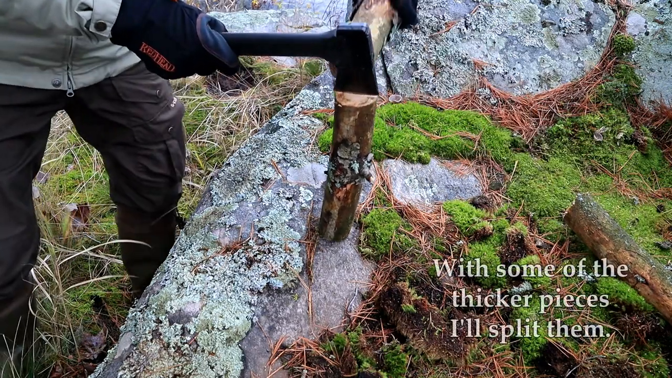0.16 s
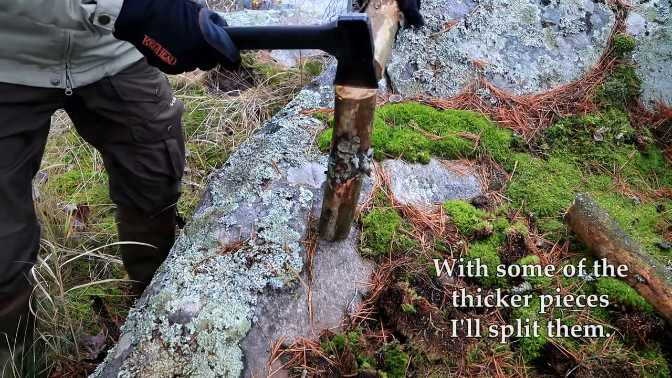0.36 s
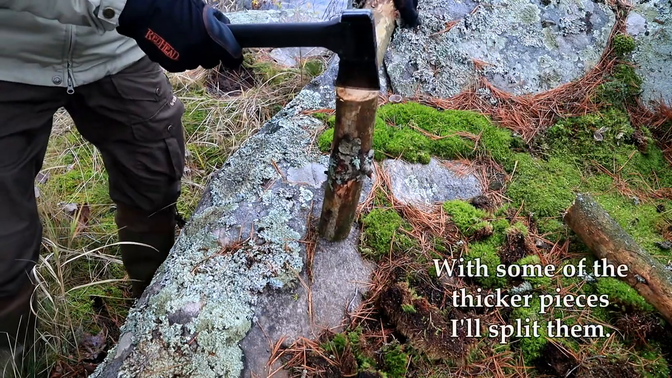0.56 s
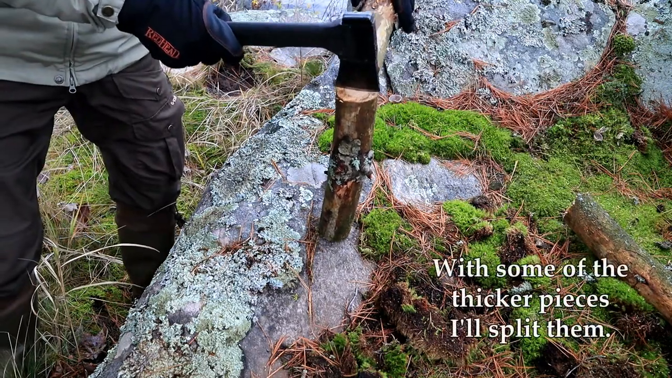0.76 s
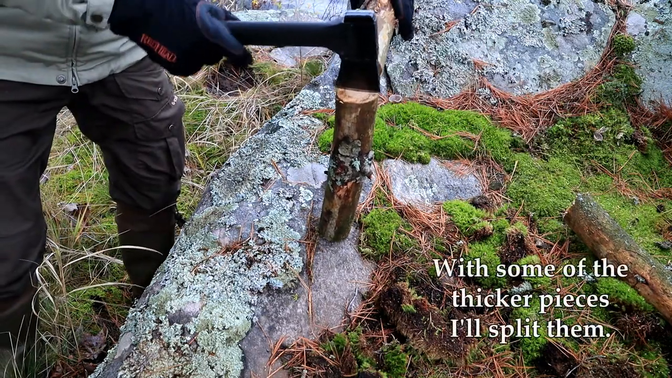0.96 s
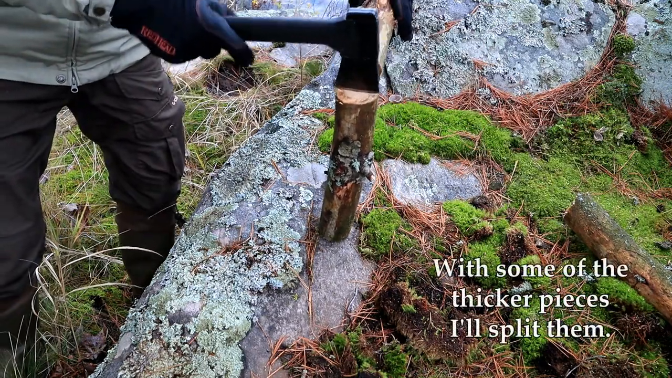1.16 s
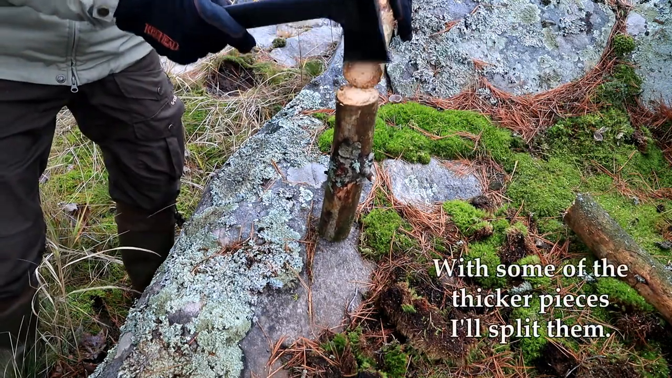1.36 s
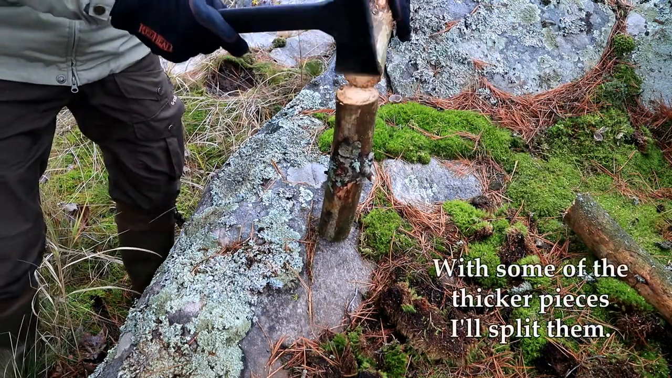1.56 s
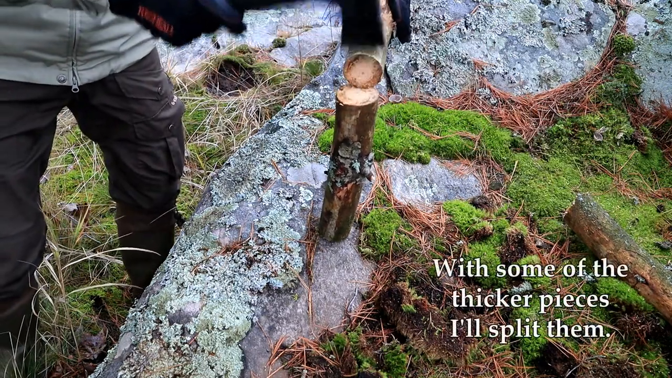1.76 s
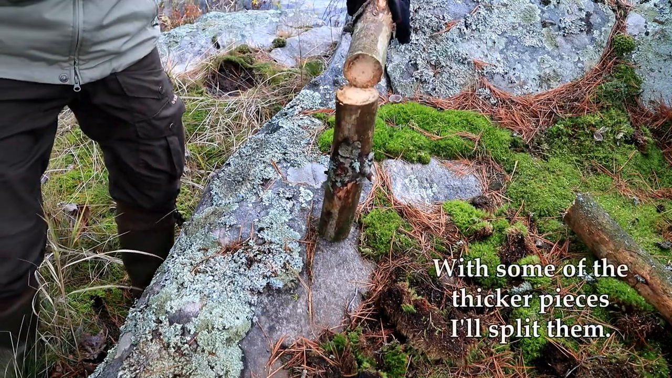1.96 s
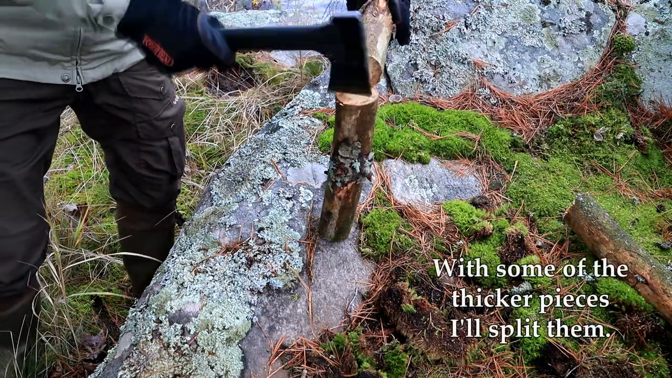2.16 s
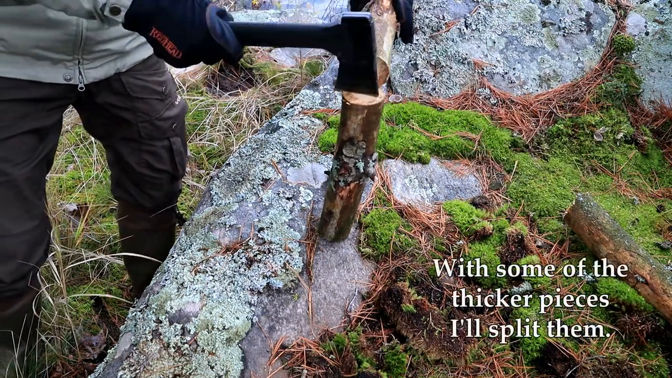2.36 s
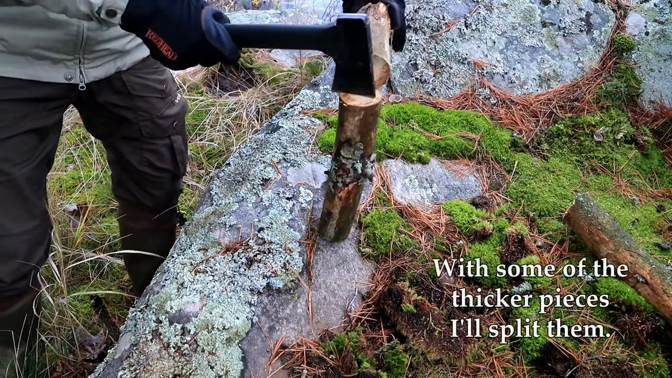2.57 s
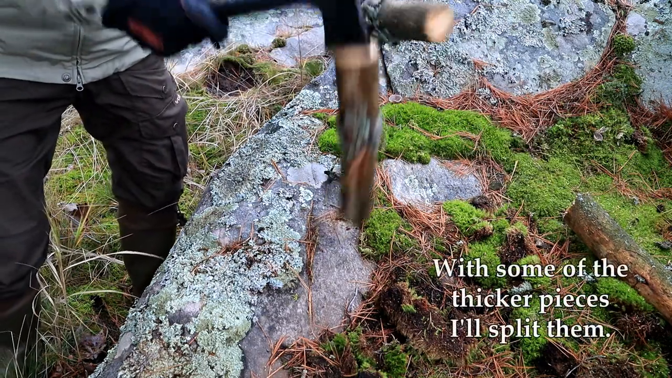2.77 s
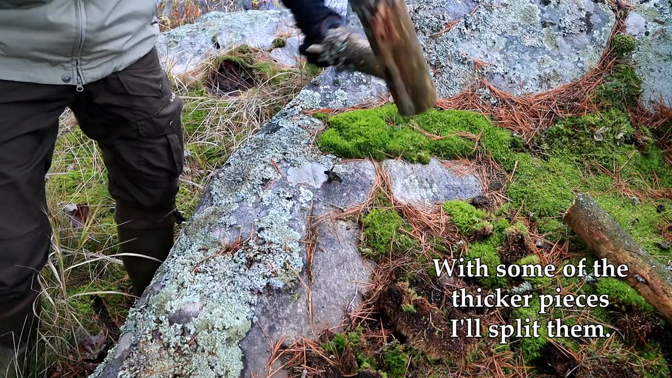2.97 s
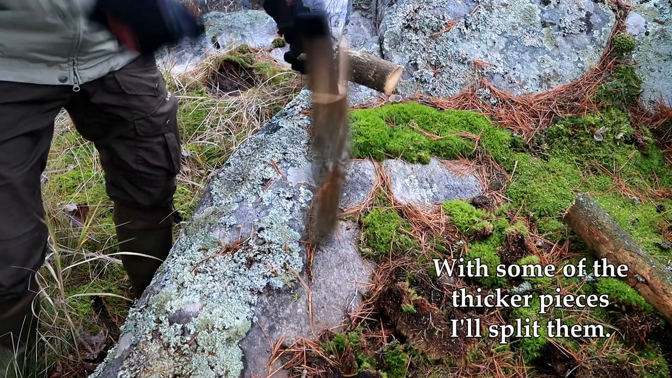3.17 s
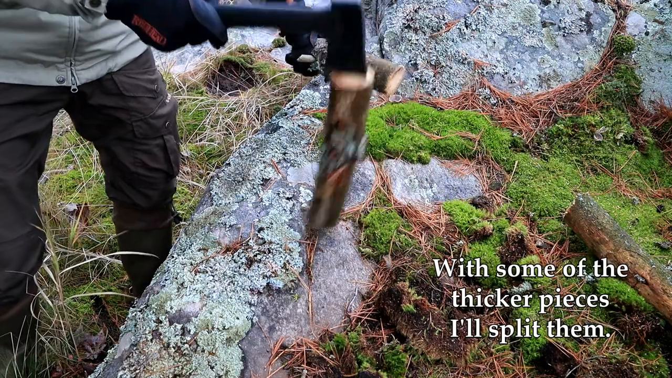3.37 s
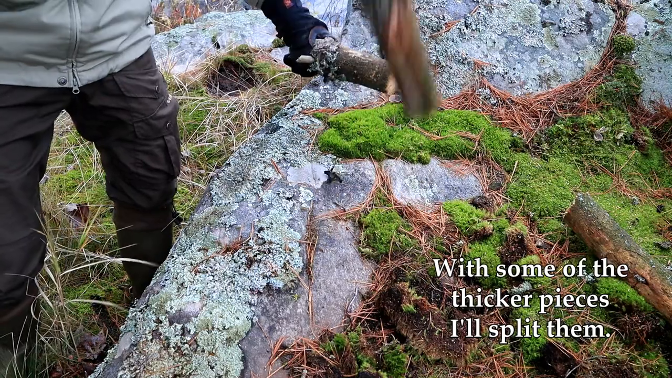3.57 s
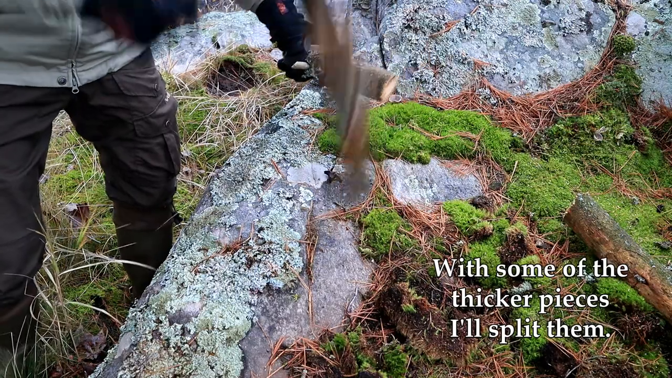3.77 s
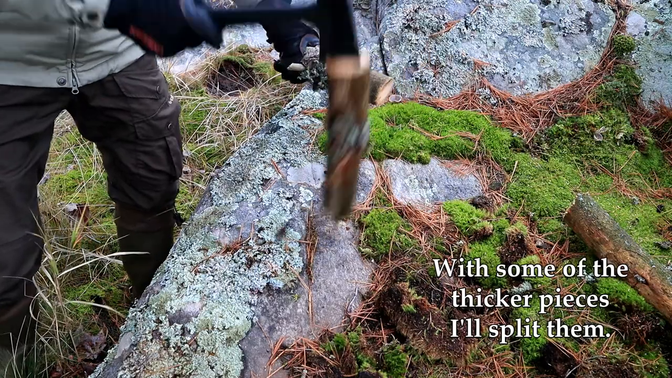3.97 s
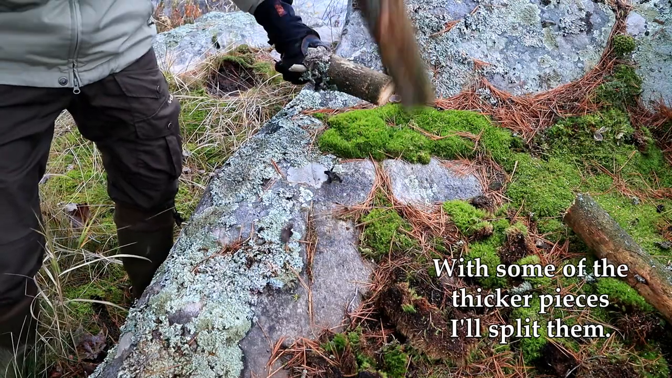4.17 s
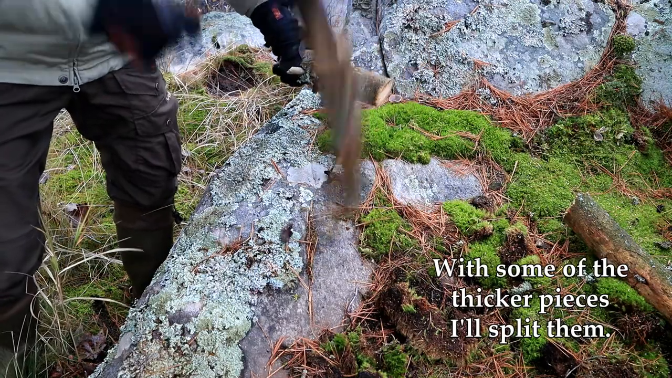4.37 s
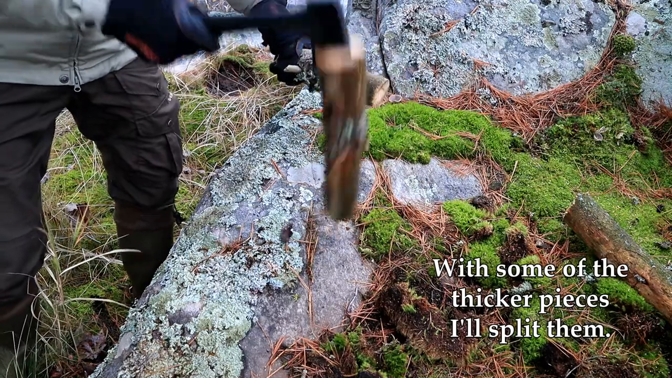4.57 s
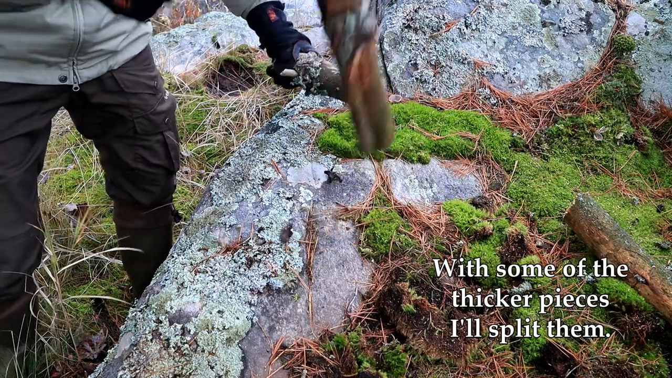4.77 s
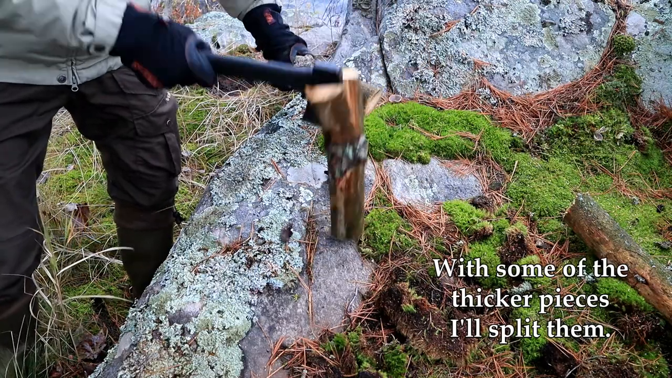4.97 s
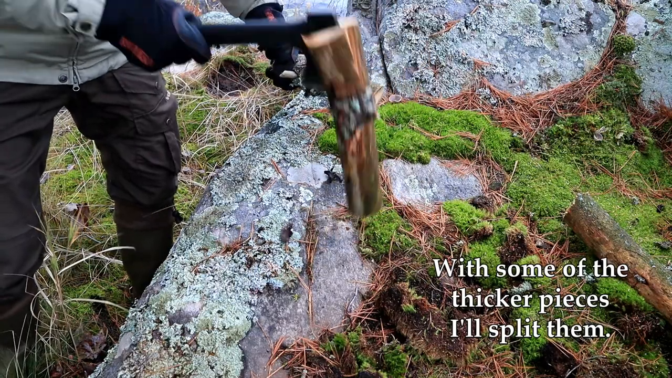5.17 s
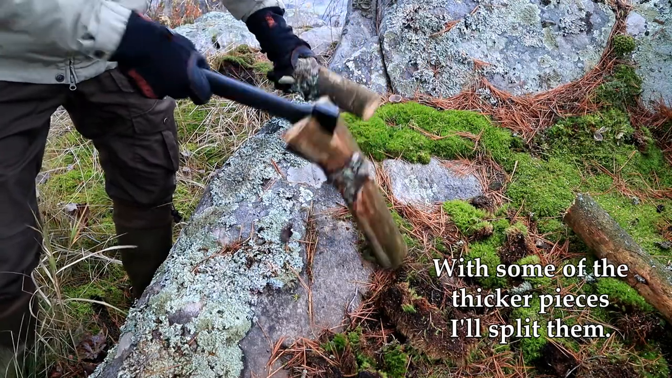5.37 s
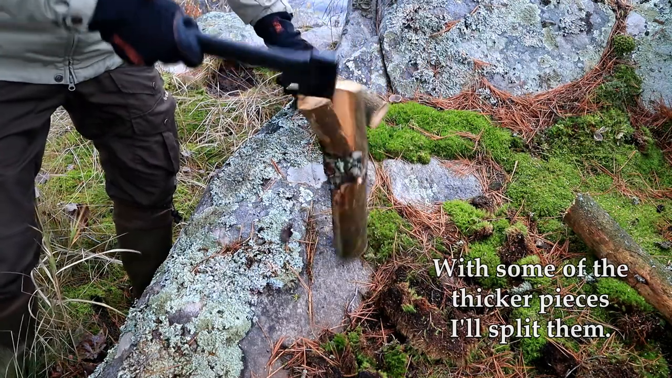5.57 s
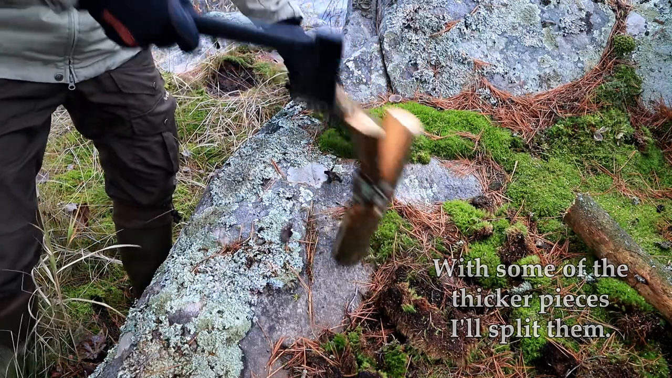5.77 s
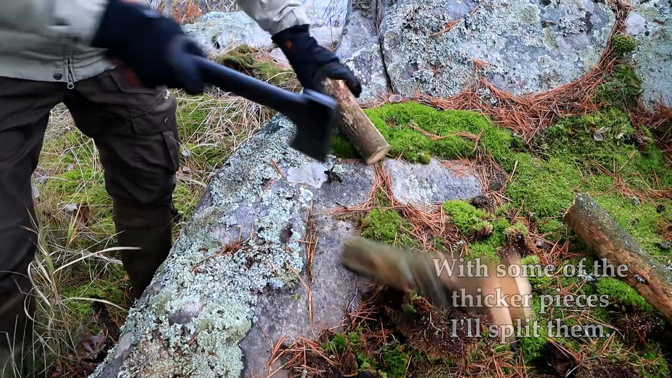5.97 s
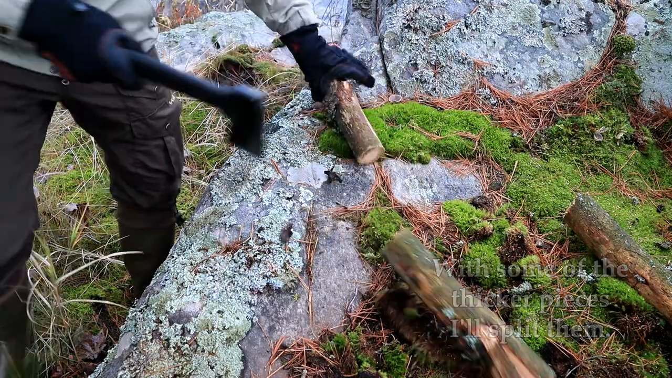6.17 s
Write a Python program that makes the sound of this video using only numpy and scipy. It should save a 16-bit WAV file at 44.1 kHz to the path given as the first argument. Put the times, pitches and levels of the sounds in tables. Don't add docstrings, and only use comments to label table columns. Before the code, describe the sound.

A faint wood scuff and light tap, then near quiet with cloth rustle and tiny ticks. Five hard, dry slams of a hatchet lodged in a log follow, the gaps shortening. The last breaks into clustered cracks; splintering and small wooden knocks follow. Close outdoor microphone, overloaded by each blow, with soft wind rumble and distant airy hiss.

```python
import sys
import numpy as np
from scipy import signal
from scipy.io import wavfile

SR = 44100
rng = np.random.default_rng(int(sys.argv[2]) if len(sys.argv) > 2 else 0)


def ratio(d):
    e = np.asarray(d, float) / 20
    return 10 ** e


def persist_wave(psi):
    counts = np.round(np.clip(psi, -1, 1) * 32767).astype(np.int16)
    wavfile.write(sys.argv[1], SR, np.atleast_2d(counts).T)


N = 274516

# t/s, contact/ms
SLAM_TIMES = [
    (.3527, .65),
    (2.2023, .4),
    (3.2348, .25),
    (3.8810, .65),
    (4.4596, .6),
    (4.9554, 1.3),
]
# strength level/dB, low push level/dB, splinter level/dB, splinter length factor
SLAMS = [(1.52, -45, -24.5, 0.79), (20, -20, 10, 0.68), (24.2, 15.5, 6.5, 0.66), (27.1, 12, 14, 0.59),
         (26.7, 17, 10, 0.84), (22, -26, 4, 0.99)]
# f/Hz, width/Hz, level/dB
LOG_MODES = [
    [(674, 250, -2), (1055, 194, 4), (1500, 100, 6), (2200, 96, -2), (3500, 120, 0)],
    [(687, 152, 4.5), (1130, 114, 2), (1800, 150, -18.5), (2780, 490, -21), (3120, 130, -16)],
    [(482, 132, 3), (1067, 154, 3), (1520, 125, -5.5), (2400, 370, -10.5), (3750, 650, -8.5)],
    [(655, 197, 1), (1020, 150, -4), (1580, 300, -13.5), (1920, 368, -5.5), (2770, 300, -17)],
    [(738, 250, 1), (966, 180, 0), (1548, 186, 10.5), (2380, 240, 3), (3750, 360, -22)],
    [(612, 280, 13), (1140, 550, -2.5), (1650, 210, -12), (2520, 290, 2), (4060, 530, -29)],
]
HANDLE_HUMS = [-70, -9.5, -14.5, -13, -72, -70]
HANDLE_HZ, HANDLE_T60_S = 310.4, 0.3
# f/Hz, t60/s
SPLINTER_T60 = [(300, 0.032), (1000, 0.051), (3000, 0.021), (8000, 0.031), (15000, 0.0076)]
# f/Hz, level/dB per Hz
SPLINTER_COLOUR = [(150, 8), (600, 4.5), (1800, 7), (4000, -6), (8000, -26.5), (15000, -66)]

# t/s, peak level/dB, centre f/Hz, t60/s
CRACKS = [(.3545, -31, 2780, 0.017), (2.2035, 14, 3280, .014), (2.547, -39, 4900, 0.05),
          (3.2348, 20.5, 3980, 0.013), (3.8827, 16, 1400, 0.022), (4.472, 18.5, 1170, 0.027),
          (4.96, 10, 5240, 0.012), (4.9647, 25.5, 3940, 0.02), (4.9765, 16.5, 6000, 0.011),
          (4.9812, 10, 4000, .014), (4.987, -10, 3020, 0.035), (5.3993, -2, 4060, 0.018),
          (5.4075, -11, 5000, .012), (5.4103, 0, 5000, 0.0049), (5.42, -19.5, 3500, 0.045),
          (5.426, -38, 4000, .013), (5.4485, 0, 10100, 0.009), (5.8571, -27, 3870, 0.033),
          (6.0945, -21, 5900, 0.0076)]
CRACK_OCTAVES, CRACK_RISE_MS = 3.8, 0.66
# t/s, peak level/dB, centre f/Hz, rise/ms
TEARS = [
    (0.034, -25, 3630, 3),
    (4.463, 27.5, 2630, 1.26),
    (5.335, -26.5, 1800, 8.9),
    (5.355, -27.5, 5330, 15),
    (5.39, -16.5, 2230, 5.9),
    (5.3965, -10.5, 3000, 1.1),
    (5.449, -23, 5040, 3.7),
    (5.603, -19, 3140, 2.8),
    (6.124, -25, 4400, 13.6),
]
TEAR_OCTAVES, TEAR_T60_PER_RISE = 4.04, 12.8
# t/s, peak level/dB, centre f/Hz
TICKS = [(.3165, -35, 3500), (.6807, -30.5, 8900), (.7653, -42, 9000), (.9963, -27.5, 5840),
         (1.7525, -36, 3000), (1.7834, -28, 6800), (1.795, -28, 3900), (1.949, -26, 1690),
         (2.289, -31, 5600), (2.296, -34, 6900), (2.378, -44, 8000), (2.735, -33, 7900), (2.999, -32, 6000),
         (3.641, -36, 8000), (3.9477, -20, 5530), (4.742, -40, 8100), (4.832, -41, 8000),
         (5.019, -34, 1990), (5.4135, -6, 6500), (5.5455, -32, 6960), (5.6517, -27.5, 2400),
         (5.8, -41, 6000), (5.818, -43, 8000), (6.19, -33, 12000)]
TICK_OCTAVES, TICK_RISE_MS, TICK_T60_S = 0.95, 0.81, 0.016

# t/s, peak level/dB, f/Hz, t60/s
KNOCKS = [(0.036, -23.5, 1540, 0.017), (0.401, -16, 900, 0.0035), (0.4019, -8.5, 314, 0.0076),
          (1.243, -26, 218, 0.033), (1.401, -30.5, 1403, 0.058), (1.888, -48, 5130, .06),
          (4.964, 22, 2210, 0.0098), (4.977, 12.5, 420, 0.009), (4.9778, 6, 2110, 0.018),
          (5.396, -8, 300, 0.012), (5.399, -16.5, 1770, 0.019), (5.411, -22, 1480, .025),
          (5.4488, -20, 2030, 0.024), (5.568, -38, 4380, 0.025), (5.606, -31.5, 2060, 0.063),
          (5.603, -41, 1070, 0.15), (5.4488, -17, 1000, 0.0078), (5.613, -10, 346, 0.01),
          (6.139, -12.5, 127, 0.018)]

# delay t/s, level/dB
ECHOES = [(.0036, -17), (.0081, -30)]
WOODS_DB, WOODS_T60_S, WOODS_LOW_HZ, WOODS_HIGH_HZ = -43.5, 0.24, 720, 6500

# t/s, peak level/dB, centre f/Hz, t60/s
SWISHES = [(0.199, -38, 3500, 0.11), (0.449, -41.5, 5760, .33), (.99, -36, 6500, 0.19),
           (1.079, -36.5, 7400, 0.036), (1.4, -38.5, 7000, 0.24), (1.48, -39.5, 7160, 0.097),
           (2.65, -40, 3850, 0.56), (3.3, -38, 4400, 0.66), (3.961, -36.5, 3500, 0.44), (4.3, -39, 3520, 1),
           (4.561, -33.5, 1720, 0.39)]
SWISH_OCTAVES, SWISH_RISE_MS = 2.1, 27.4
# t/s, peak level/dB, centre f/Hz, t60/s
BLADE_RINGS = [(.03, -58, 5370, 2.5), (1.53, -47, 3910, 1.3), (2.23, -39, 3750, .24),
               (4.47, -33, 3600, 0.43)]
BLADE_OCTAVES, BLADE_RISE_MS = 0.1, 21

# t/s, rustle level/dB
STIR = [(0.0, -48.5), (0.52, -62), (0.99, -55.5), (1.6, -58.5), (2.11, -58.5), (2.3, -77), (2.56, -61),
        (3.26, -53.5), (3.43, -67.5), (3.9, -53), (4.02, -70), (4.28, -57), (4.43, -65.5), (4.87, -56),
        (5.08, -71), (5.49, -53.5), (5.68, -59), (6.22, -50)]
# f/Hz, level/dB per Hz
RUSTLE_COLOUR = [(700, 2.5), (1500, 7), (3000, 3), (5500, 1.5), (8600, -1), (9800, -15), (15500, -11)]
# t/s, level/dB
WIND_GUSTS = [(0.0, -46.5), (0.24, -44.5), (0.45, -55), (2.4, -53), (2.65, -49.5), (3.15, -45.5),
              (3.5, -48), (3.83, -42.5), (4.25, -44), (4.54, -37), (4.78, -35), (4.99, -23.5),
              (5.08, -31.5), (5.44, -49), (5.65, -40), (5.82, -30.5), (6.06, -39.5), (6.22, -33)]
# f/Hz, level/dB per Hz
WIND_COLOUR = [(8.8, -30), (15, -3), (35, -4), (134, -11), (162, -16.5), (226, -20), (308, -41), (500, -56),
               (650, -61), (1100, -120)]
# f/Hz, level/dB per Hz
AIR_COLOUR = [(71, -47), (120, -7.5), (237, -1), (291, -3.5), (388, -2), (885, -1.5), (2380, -18.5),
              (5890, -23), (8360, -21), (10100, -30.5), (15200, -20.5), (16500, -33)]
AIR_DB, AIR_FOLLOWS = -48, 0.15

# f/Hz, width/Hz, level/dB
MIC_PEAK = (8200, 1840, -5)
OVERSHOOT = 1.14
LIMIT_DB, RECOVER_DB_PER_S, ATTACK_S = 0, 300, 0.0009
HISS_DB, CUTOFF_HZ = -73, 16200


def rms_one(x):
    return x / np.sqrt(np.mean(x ** 2) + 1e-20)


def in_time(rows):
    return np.interp(np.arange(N) / SR, *np.transpose(rows))


def at_hz(points, hz):
    table = np.array(points)
    return np.interp(np.log(hz), np.log(table[:, 0]), table[:, 1])


def add(track, s, sound):
    start = round(s * SR)
    track[start:start + len(sound)] += sound[:N - start]


def band(x, low_hz, high_hz):
    edges = np.clip([low_hz, high_hz], 10, [0.4 * SR, 0.45 * SR])
    return signal.sosfilt(signal.butter(2, edges, "band", fs=SR, output="sos"), x)


def mode(hz, t60, size=8000):
    t = np.arange(size) / SR
    return np.sin(2 * np.pi * hz * t) * ratio(-60 * t / t60)


def log_ring(modes, contact_ms):
    rings = 0
    for k, (hz, width, db) in enumerate(modes):
        width = max(width, 160)
        swing = (-1) ** (k + 1)
        rings = rings + swing * ratio(db) * width / 200 * mode(hz, 2.6 / width)
    ms = np.arange(200) / SR * 1000
    contact = ms * np.exp(-4 * ms / contact_ms)
    rings = band(rings, 259, 21400)
    return np.convolve(rings, contact / contact.sum())


def splinters(length, rise_ms, size=4000):
    t = np.arange(size) / SR
    edges = 100 * 2 ** np.arange(0, 7.6, 0.5)
    white = rng.standard_normal((2, size))
    tail = 0
    for k, (low, high) in enumerate(zip(edges, edges[1:])):
        t60 = length * at_hz(SPLINTER_T60, low)
        tail = tail + band(white[k % 2], low, high) * ratio(at_hz(SPLINTER_COLOUR, low) - 60 * t / t60)
    return 4.36 * tail * np.minimum(t * 1000 / rise_ms, 1) ** 2


def slams():
    out = np.zeros(N)
    for (s, contact_ms), slam, modes, hum_db in zip(SLAM_TIMES, SLAMS, LOG_MODES, HANDLE_HUMS):
        strength_db, push_db, tail_db, length = slam
        add(out, s, ratio(strength_db) * log_ring(modes, contact_ms))
        add(out, s, -ratio(push_db) * mode(156, 0.041))
        add(out, s, ratio(tail_db) * splinters(length, rise_ms=2 * contact_ms))
        add(out, s, -ratio(hum_db) * mode(HANDLE_HZ, HANDLE_T60_S, size=20000))
    return out


def bursts(events, size):
    out = np.zeros(N)
    ms = np.arange(size) / SR * 1000
    for s, peak_db, hz, octaves, rise_ms, t60 in events:
        low, high = hz * 2 ** (-octaves / 2), hz * 2 ** (octaves / 2)
        crackle = rng.standard_normal(size) * ratio(9.5 * rng.standard_normal(size))
        crackle = signal.lfilter([1], [1, -np.exp(-2 * np.pi * 0.61 * hz / SR)], crackle)
        rise = np.minimum(ms / rise_ms, 1)
        shape = rise * ratio(-0.06 * np.maximum(ms - rise_ms, 0) / t60)
        click = band((ms == 0) + 1e-18, low, high)
        click *= -2.5 * np.exp(-rise_ms / 1.1) / np.abs(click).max()
        add(out, s, ratio(peak_db - 11.5) * (rms_one(band(crackle, low, high)) * shape + click))
    return out


def fibres():
    cracks = [(s, db, hz, CRACK_OCTAVES, CRACK_RISE_MS, t60) for s, db, hz, t60 in CRACKS]
    tears = [(s, db, hz, TEAR_OCTAVES, ms, TEAR_T60_PER_RISE * ms / 1000) for s, db, hz, ms in TEARS]
    ticks = [(s, db, hz, TICK_OCTAVES, TICK_RISE_MS, TICK_T60_S) for s, db, hz in TICKS]
    return bursts(cracks + tears + ticks, size=6000)


def knocks():
    out = np.zeros(N)
    for s, peak_db, hz, t60 in KNOCKS:
        add(out, s, ratio(peak_db) * band(mode(hz, t60), hz / 2, hz * 2))
    return out


def rocks_and_woods(x, size=22050):
    out = x.copy()
    dull = band(x, 260, 4700)
    for delay_s, echo_db in ECHOES:
        add(out, delay_s, ratio(echo_db) * dull)
    t = np.arange(size) / SR
    scatter = rng.standard_normal(size) * np.minimum(t / 0.0084, 1) * ratio(-60 * t / WOODS_T60_S)
    scatter = band(scatter, WOODS_LOW_HZ, WOODS_HIGH_HZ)
    return out + ratio(WOODS_DB) * signal.fftconvolve(x, scatter / np.linalg.norm(scatter))[:N]


def swishes():
    cloth = [(s, db, hz, SWISH_OCTAVES, SWISH_RISE_MS, t60) for s, db, hz, t60 in SWISHES]
    steel = [(s, db, hz, BLADE_OCTAVES, BLADE_RISE_MS, t60) for s, db, hz, t60 in BLADE_RINGS]
    return bursts(cloth + steel, size=28000)


def drift(rate):
    r = np.exp(-80 * np.pi * rate / SR)
    slow = signal.lfilter([1], [1, -2 * r, r * r], rng.standard_normal(N // 40 + 2002))[2000:]
    return np.interp(np.arange(N) / 40, np.arange(len(slow)), rms_one(slow))


def banded_noise(spectrum, patchy_db, flicker_per_s):
    edges = 15 * 2 ** np.arange(0, 10.6, 0.5)
    edges = edges[(edges > spectrum[0][0] / 1.5) & (edges < spectrum[-1][0] * 1.5)]
    together = drift(flicker_per_s / 2)
    white = rng.standard_normal((2, N))
    out = 0
    for k, (low, high) in enumerate(zip(edges, edges[1:])):
        flicker_db = patchy_db * (together + drift(flicker_per_s))
        level_db = at_hz(spectrum, np.sqrt(low * high)) + flicker_db
        out = out + ratio(level_db) * band(white[k % 2], low, high)
    return rms_one(out)


def rustle():
    return ratio(in_time(STIR) + 1) * banded_noise(RUSTLE_COLOUR, patchy_db=1.0, flicker_per_s=87.0)


def wind():
    return ratio(in_time(WIND_GUSTS)) * banded_noise(WIND_COLOUR, patchy_db=2.4, flicker_per_s=20.0)


def far_air():
    stir_db = in_time(STIR)
    level_db = AIR_DB + AIR_FOLLOWS * (stir_db - stir_db.mean())
    return ratio(level_db) * banded_noise(AIR_COLOUR, patchy_db=0.57, flicker_per_s=11.7)


def scene():
    background = wind() + far_air() + rustle()
    work = slams() + fibres() + knocks()
    return (rocks_and_woods(work) + swishes() + background)[None]


def top_cut(x):
    return signal.sosfilt(signal.butter(12, 17000, fs=SR, output="sos"), x)


def record(dry):
    hz, width, peak_db = MIC_PEAK
    dry = dry + ratio(peak_db) * band(dry, hz - width / 2, hz + width / 2)
    over_db = OVERSHOOT * np.maximum(20 * np.log10(np.abs(dry) + 1e-9) - LIMIT_DB, 0)
    ramp_db = RECOVER_DB_PER_S * np.arange(N) / SR
    held_db = np.maximum.accumulate(over_db + ramp_db, axis=1) - ramp_db
    lag = np.exp(-1 / (ATTACK_S * SR))
    cut_db = signal.lfilter([(1 - lag) ** 2], [1, -2 * lag, lag ** 2], held_db)
    ducked = dry * ratio(-cut_db)
    mix = np.clip(ducked, -1, 1) + ratio(HISS_DB) * rng.standard_normal(dry.shape)
    mix = signal.sosfilt(signal.cheby2(16, 55, CUTOFF_HZ, fs=SR, output="sos"), mix)
    return top_cut(mix)


dry = scene()
out = record(dry)
persist_wave(out)
```